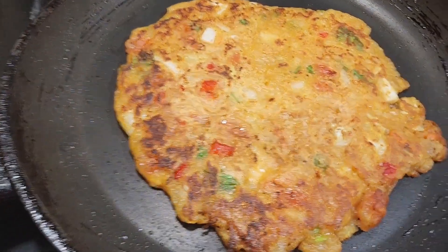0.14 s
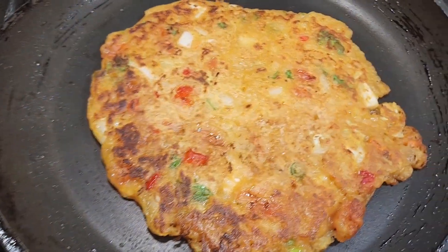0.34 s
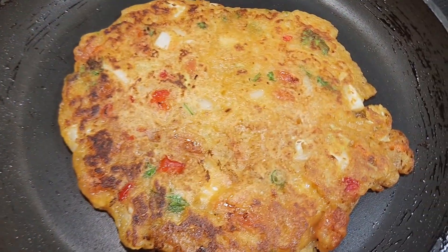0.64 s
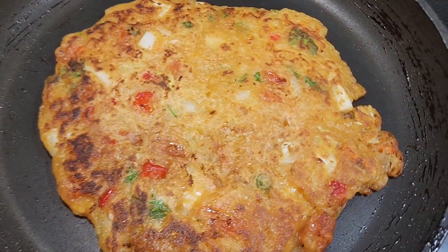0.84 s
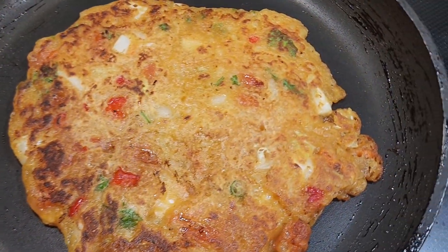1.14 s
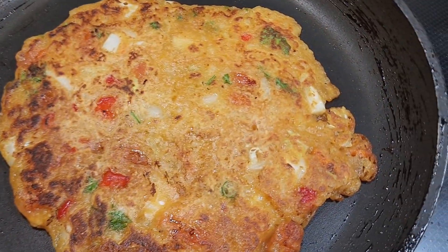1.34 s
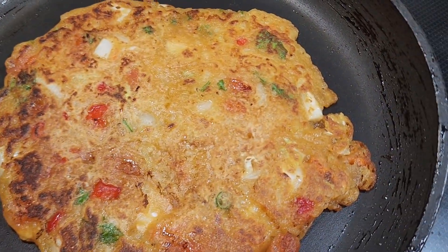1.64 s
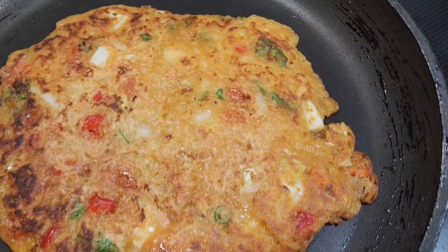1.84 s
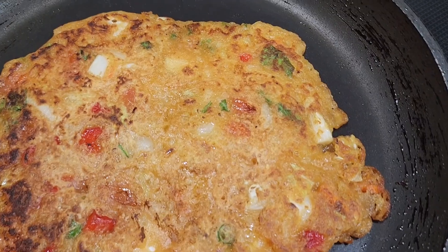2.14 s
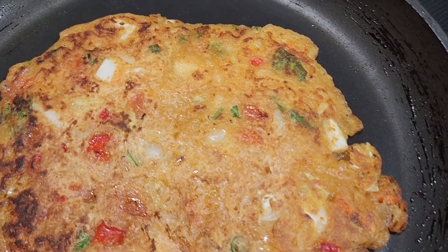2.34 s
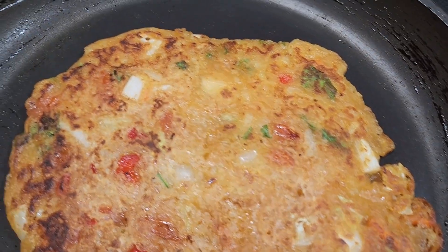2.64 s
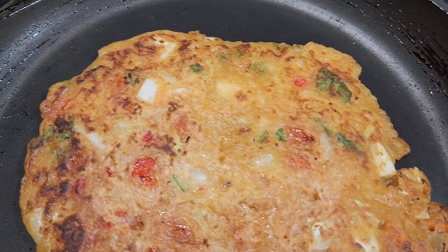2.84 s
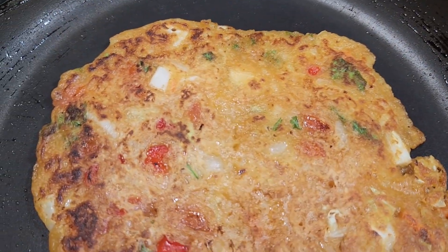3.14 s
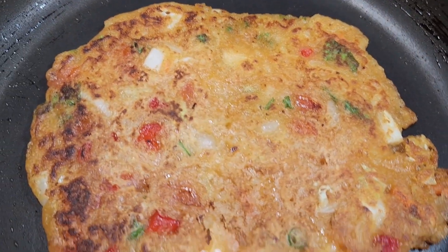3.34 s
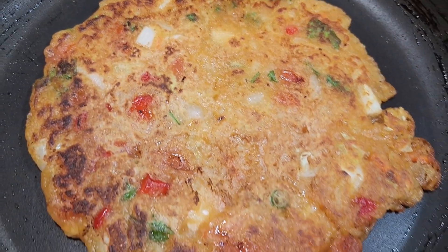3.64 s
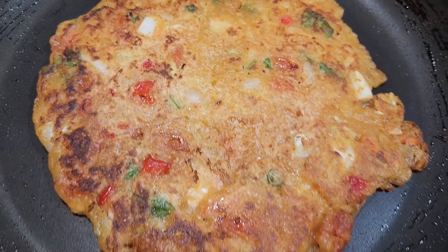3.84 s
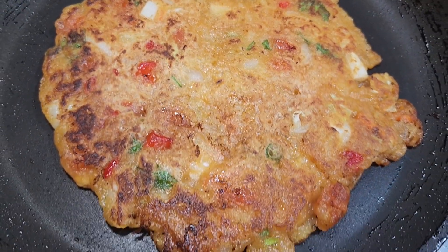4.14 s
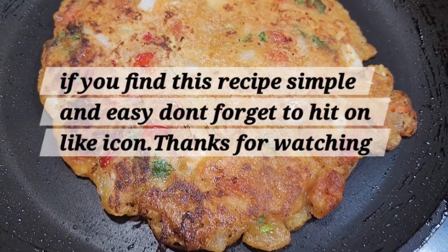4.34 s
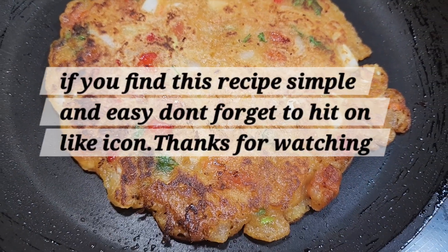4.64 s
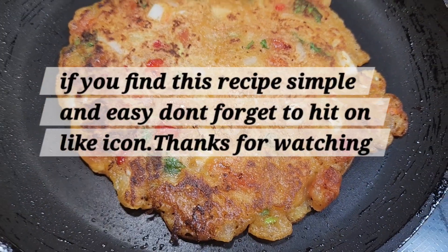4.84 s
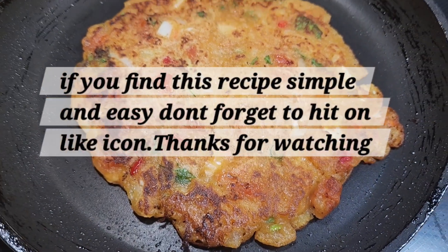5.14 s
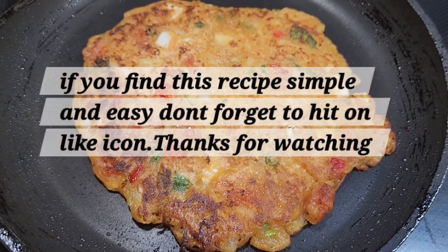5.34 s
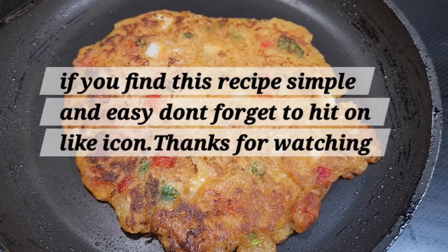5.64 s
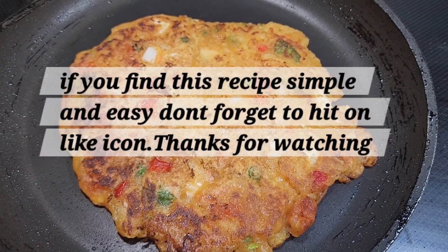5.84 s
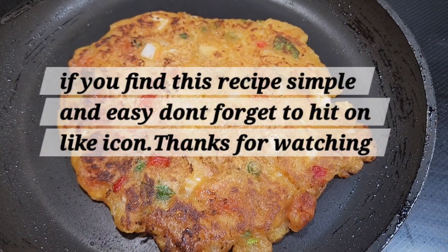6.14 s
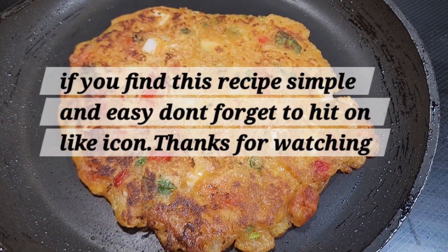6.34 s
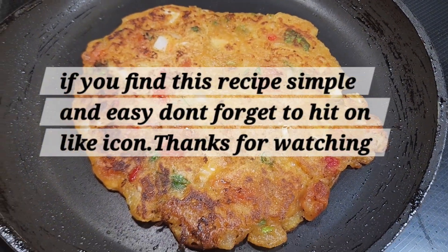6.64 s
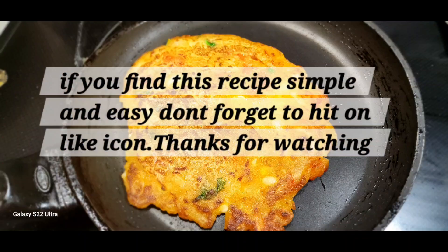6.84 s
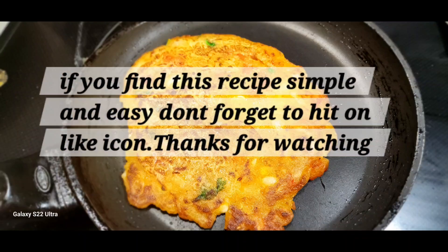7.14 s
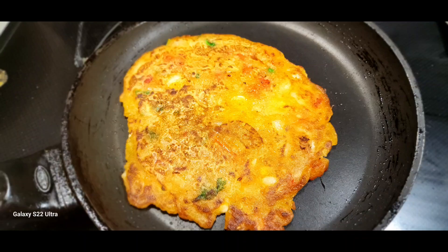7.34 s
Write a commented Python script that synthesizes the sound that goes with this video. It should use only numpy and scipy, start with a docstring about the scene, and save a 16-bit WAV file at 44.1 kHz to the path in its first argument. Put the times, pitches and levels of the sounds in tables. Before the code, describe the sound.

Close, fizzy frying with popping droplets and a few late spits of steam, above a low kitchen fan hum.

```python
"""A kitchen stove, two microphones close to a nonstick pan, the left one nearer, the right facing away.
A thick pancake fries gently: tiny steam bubbles fizz and crackle in the oil, surge early, then settle.
Single droplets pop as their films tear, and late on the batter spits short jets of steam.
A kitchen fan and a mains hum drone in the background; the sound stops abruptly."""
import sys
import numpy as np
from scipy import signal
from scipy.fft import rfft, irfft, next_fast_len
from scipy.io import wavfile
from scipy.ndimage import map_coordinates

SR = 44100
rng = np.random.default_rng(int(sys.argv[2]) if len(sys.argv) > 2 else 0)


def materialize(psi):
    """Save the field psi as 16-bit PCM at rate SR to the path in sys.argv[1].

    A 1-D psi becomes a single channel; in a 2-D psi each row is a channel.
    """
    bounded = np.clip(np.atleast_2d(psi).T, -1, 1)
    quanta = np.round(bounded * 32767).astype(np.int16)
    wavfile.write(sys.argv[1], SR, quanta)


N = 330740
SPIT_S, END_S = 5.5, 6.786  # the late spitting lasts from one to the other
TOP_HZ = 15620  # upper edge of the sound

# colour of the fan's rushing air: frequency_hz, relative_db
FAN_COLOUR = [(25, -17.5), (40, -11.5), (60, -6), (80, -1.5), (110, 4), (140, 0), (165, 1.5), (215, -2),
              (290, -1.5), (450, -12), (600, -14.5), (820, -20.5), (1300, -19.5), (1750, -21),
              (2400, -25.5), (6000, -31)]
# resonances of the fan's housing and the stove corner: centre_hz, width_hz, left_lift_db, right_lift_db
FAN_RESONANCES = [(251, 27, 4.5, 3), (394.6, 39, 9.5, 5), (512, 55, 11, 2), (692, 50, 0.5, 10.5),
                  (746, 57, 7, -19), (951, 79, 4, 6.5), (1260, 42, 0, 9), (1560, 280, 6.5, 0)]
# likeness of the air noise at the two microphones: frequency_hz, likeness (0-1)
FAN_LIKENESS = [(60, 0.98), (130, 0.99), (290, 0.95), (640, 0.89), (1400, 0.34), (3000, 0.08)]
# steady tones of the fan and the mains: pitch_hz, level_db, waver_db
HUM_TONES = [(92.53, -37, 1), (119.1, -40, 1.5), (186.5, -51, 1), (250, -52, 3), (399, -58, 3)]
# decay of the small kitchen: frequency_hz, t60_s
ROOM_DECAY = [(300, 0.33), (3000, 0.2), (14000, 0.11)]
# surges of the frying as moisture reaches the oil: peak_s, rise_s, fall_s, lift_db
FRYING_SURGES = [(.46, 0.18, 0.22, 4), (.95, 0.16, 0.24, 1.1), (1.3, 0.19, 0.092, 0.75),
                 (2.301, 0.39, 0.25, 1), (5.9, 0.41, 0.91, 2)]
# colour of the fizz at each microphone, and of the crackle: frequency_hz, relative_db
FIZZ_LEFT = [(300, -34), (900, -11.5), (1650, -1), (2300, 1.5), (3300, -0.5), (5200, -10), (8000, -2),
             (10000, -10), (11500, 0.5), (12800, 2), (14000, 0.5), (15300, 4)]
FIZZ_RIGHT = [(300, -35.5), (900, -2.5), (1500, -15.5), (2200, -15), (3300, -30), (6000, -5), (7500, -6.5),
              (8800, -19.5), (11000, -22), (15300, -7.5)]
CRACKLE_COLOUR = [(500, -36.5), (1500, -12), (2600, 2), (4200, 5), (6000, -4.5), (8000, -4.5),
                  (10300, -0.5), (11500, 6.5), (12700, 4.5), (15300, 1)]
# steam jets from under the batter: start_s, level_db, t60_s, vent_hz, whistle (0-1), rim_jolt (0-1)
STEAM_JETS = [(5.5828, -24.5, 0.05, 1520, 0, 1), (5.592, -32.5, 0.3, 1520, 0, 0),
              (5.7015, -27.3, 0.135, 1860, 0.45, 0.4), (5.992, -39, 0.23, 1710, 0, 0)]
# colour of escaping steam: frequency_hz, relative_db
STEAM_COLOUR = [(500, -24.5), (1500, -5), (3600, 1), (5500, -4.5), (9000, -1.5), (12000, -1), (15500, -2.5)]
# partials of the pan's bare rim: pitch_hz, level_db
RIM_PARTIALS = [(3050, -44), (4570, -45), (5650, -41), (6840, -38), (9030, -40), (10520, -36), (12900, -40)]
# partials of the pan, damped by the batter: pitch_hz, relative_db, t60_s
PAN_PARTIALS = [(1464, -3, 0.015), (1900, -4.5, 0.01), (2540, 2.5, 0.0094)]
# the loudest bursting droplets: start_s, relative_db, left_over_right_db, body_over_snap_db
LOUD_DROPLETS = [(0.1947, -34, 15, -8), (0.2535, -33, 13, -8), (0.2606, -26.5, 17, -10),
                 (0.269, -34, 13, -8), (0.312, -34, 16, -5), (0.3203, -33, 16, -6), (0.3478, -33, 16, -6),
                 (0.386, -32, 16, -10), (0.3954, -28, 16, -10), (0.4102, -30, 15, -7),
                 (0.4237, -31, 16, -5), (0.4366, -28.5, 15, -8), (0.451, -28.5, 18, -10),
                 (0.4602, -31, 16, -8), (0.4785, -30.5, 16, -10), (0.4845, -28.5, 17, -10),
                 (0.4987, -27, 17, -10), (0.5232, -28, 14, -9), (0.5362, -31.5, 16, -10),
                 (0.5405, -32, 16, -10), (0.5678, -31, 16, -6), (0.5979, -26.5, 17, -10),
                 (0.6184, -28, 18, -10), (0.6436, -33, 17, -7), (0.6591, -34, 16, -8),
                 (0.6811, -34.5, 14, -6), (0.8181, -30.5, 17, -6), (0.8502, -32.5, 19, -8),
                 (0.9071, -22.3, 15, -10), (0.9229, -26.5, 18, -8), (0.9704, -33.5, 16, -8),
                 (1.0268, -33.5, 16, -8), (1.0527, -33.5, 15, -8), (1.0662, -33, 16, -8),
                 (1.179, -28, 17, -6), (1.2253, -34.5, 14, -8), (1.2605, -23.2, 16, -7),
                 (1.2822, -31, 17, -8), (1.3391, -34.5, 17, -6), (1.3565, -28, 17, -10),
                 (1.377, -33, 16, -6), (1.6173, -29.5, 12, -8), (1.7825, -35, 14, -8),
                 (2.1108, -36, 14, -1), (2.1273, -36.5, 16, -1), (2.1705, -33.5, 4, -4),
                 (2.2635, -36.5, 16, -8), (2.2749, -34, 16, -3), (2.3356, -28, 4, -11),
                 (2.4565, -34, 17, -6), (2.6005, -31.5, 2, -4), (2.821, -30, 17, -4),
                 (2.8726, -34.5, 14, -3), (2.9492, -29.5, 16, -6), (3.1085, -28, 10, -8),
                 (3.717, -30, 13, -6), (4.6899, -38.5, -1, -1), (4.8424, -34.5, -3, 0),
                 (4.9474, -36, -2, -3), (5.1655, -36, 14, -11), (5.3103, -33, 12, -16),
                 (5.3784, -35.5, -1, -8), (5.5533, -27.3, 1, 2), (5.5826, -26, -4, -5),
                 (5.6371, -21.5, 3, 1), (5.6484, -24.3, 0, -2), (5.7139, -32, 0, -5), (5.8413, -34, 4, -4),
                 (5.8518, -36, 1, -3), (5.8955, -31, 3, -2), (6.0168, -35, 2, 0), (6.0447, -28, 0, -2),
                 (6.3216, -33, 3, -2), (6.4448, -32, 3, -3), (6.57, -36, 2, -1), (6.6789, -36.5, 2, -3),
                 (6.7642, -28, 2, -1)]
# colour of a pop's dark body and of its film's bright snap: frequency_hz, relative_db
BODY_COLOUR = [(400, -30), (900, -15), (1400, -1), (2400, -0.5), (4000, -0.5), (6500, -6), (15000, -33)]
SNAP_COLOUR = [(1600, -28), (3000, -6.5), (4500, -1.5), (7000, -1), (9800, -1.5), (12500, 5), (15500, 1.5)]
# further colouring of the pops at the right microphone, off axis: frequency_hz, relative_db
OFF_AXIS_COLOUR = [(1800, -5), (4000, -1), (6800, 6.5), (10000, 7.5), (13000, 3)]


def amp(db):
    """Decibels to gain."""
    return 10 ** (np.asarray(db) / 20)


def unit(x):
    """x at rms 1."""
    return x / np.sqrt(np.mean(x ** 2) + 1e-20)


def along(points, hz):
    """(Hz, value) points read on a log axis."""
    f, v = np.transpose(points)
    return np.interp(np.log(hz + 1), np.log(f + 1), v)


def wobble(rate):
    """A smooth random curve with rate knots a second."""
    knots = rng.standard_normal(int(N * rate / SR) + 4)
    return map_coordinates(knots, [np.arange(N) * rate / SR])


def filtered(x, response):
    """x times a response of frequency."""
    size = next_fast_len(N + SR // 2)
    return irfft(rfft(x, size) * response(np.fft.rfftfreq(size, 1 / SR)), size)[..., :N]


def coloured(x, spectrum, size=1024):
    """x through a causal filter that keeps attacks sharp and the power of white noise unchanged."""
    gain = unit(amp(along(spectrum, np.fft.rfftfreq(size, 1 / SR))))
    cepstrum = irfft(np.log(gain))
    cepstrum[1:size // 2] *= 2  # fold to minimum phase
    cepstrum[size // 2 + 1:] = 0
    impulse = irfft(np.exp(rfft(cepstrum)))
    return signal.fftconvolve(x, impulse[None], axes=1)[:, :N]


def panned(pan_db):
    """Left and right gains of unit mean power; positive is left."""
    return unit(amp([[pan_db / 2], [-pan_db / 2]]))


def add(track, start_s, sound):
    """Mix a sound into the track at start_s."""
    part = track[:, round(start_s * SR):][:, :sound.shape[1]]
    part += sound[:, :part.shape[1]]


def hum(drift_rad=0.12):
    """In the background the fan's blade tone and the mains hum beat under fainter tones, all wavering."""
    t = np.arange(N) / SR
    return sum(np.sqrt(2) * amp(db + waver_db * wobble(5))
               * np.sin(2 * np.pi * hz * t + drift_rad * wobble(3)) for hz, db, waver_db in HUM_TONES)


def fan(low_db=-36, upper_db=-46, split_hz=800, waver_db=0.3):
    """Air rushes through the fan's resonant housing; the bass is alike at both microphones."""
    def mid_and_side(hz):
        angle = np.arccos(np.clip(along(FAN_LIKENESS, hz), -1, 1)) / 2
        return np.array([np.cos(angle), np.sin(angle)])

    def housing(hz):
        lift_db = sum(np.outer([left, right], np.exp(-2 * ((hz - centre) / width) ** 2))
                      for centre, width, left, right in FAN_RESONANCES)
        return amp(along(FAN_COLOUR, hz) + lift_db)

    mid, side = filtered(rng.standard_normal((2, N)), mid_and_side)
    air = filtered(np.array([mid + side, mid - side]), housing)
    low = filtered(air, lambda hz: 1 / (1 + (hz / split_hz) ** 8))
    return (amp(low_db) * unit(low) + amp(upper_db) * unit(air - low)) * amp(waver_db * wobble(1.6))


def fan_note(centre_hz=1278, q=16, faint_db=-64, full_db=-53.5, draw_back_s=4.8, rise_s=0.8):
    """A narrow band of the fan's air makes a fuzzy note, growing as the microphones draw back."""
    common, left, right = signal.lfilter(*signal.iirpeak(centre_hz, q, SR), rng.standard_normal((3, N)))
    growth = np.clip((np.arange(N) / SR - draw_back_s) / rise_s, 0, 1)
    return unit(common + np.array([left, right])) * amp(faint_db + (full_db - faint_db) * growth)


def kitchen_echo(x, wall_s, wall_db, tail_db):
    """The pan wall and stove scatter a quick, close echo; the small room adds a short tail."""
    hz, frame_s, noise = signal.stft(rng.standard_normal((2, SR // 4)), SR, nperseg=256)
    decay = amp(-60 * frame_s / along(ROOM_DECAY, hz)[:, None])
    tail = signal.istft(noise * decay, SR, nperseg=256)[1]
    t = np.arange(tail.shape[1]) / SR
    tail *= t > wall_s
    near = rng.standard_normal(tail.shape) * (t / wall_s) ** 2 * np.exp(-2 * t / wall_s)
    echo = amp(wall_db) * near / np.linalg.norm(near[0]) + amp(tail_db) * tail / np.linalg.norm(tail[0])
    return signal.fftconvolve(x.mean(0)[None], echo, axes=1)[:, :N]


def bubbles(per_s, spread_db, life_s, size=64):
    """Bubbles bursting at random, each a brief damped ring; most are tiny, a few large."""
    start, pitch, strength, life = rng.random((int(per_s * N / SR), 4)).T[:, :, None]
    t = np.arange(size) / SR
    level_db = -spread_db * np.log(.01 + strength)
    decay = np.exp(-t / (life_s * (.5 + life)))
    rings = amp(level_db) * np.sin(2 * np.pi * pitch * TOP_HZ * t) * decay
    where = (start * N).astype(int) + np.arange(size)
    return unit(np.bincount(where.ravel(), rings.ravel(), N + size)[:N])


def spatter(level_db=-55, pan_db=5):
    """Coarse single bubbles tick faintly in the middle of the pan and reach both microphones."""
    ticks = amp(level_db) * bubbles(per_s=240, spread_db=2.5, life_s=.00008)
    return coloured(panned(pan_db) * np.array([ticks, np.roll(ticks, 4)]), STEAM_COLOUR)


def rim(t, t60_s=.15):
    """The bare rim rings briefly, each partial a little out of step at the two microphones."""
    partials = sum(amp(db) * np.sin(2 * np.pi * hz * t + rng.standard_normal((2, 1)))
                   for hz, db in RIM_PARTIALS)
    return partials * amp(-60 * t / t60_s)


def steam_jets(rise_s=0.00014, pan_db=-2.5, vent_q=7, vent_echo=.45, sputter_db=.9):
    """Trapped steam breaks out and hisses away; its vent resonates like a pipe, its jolt rings the rim."""
    hiss, tones = np.zeros((2, 2, N))
    t = np.arange(SR // 4) / SR
    hz = np.fft.rfftfreq(len(t), 1 / SR)
    for start_s, db, t60_s, vent_hz, strength, jolt in STEAM_JETS:
        envelope = amp(db - 60 * t / t60_s) * (1 - np.exp(-t / rise_s))
        steam, flow = rng.standard_normal((2, 2, len(t)))
        pipe = 1 / (1 - vent_echo * np.exp(-2j * np.pi * hz / vent_hz))
        whistle = unit(signal.lfilter(*signal.iirpeak(2 * vent_hz, vent_q, SR), flow))
        add(hiss, start_s, envelope * unit(irfft(rfft(steam) * pipe, len(t))))
        add(tones, start_s, envelope * strength * whistle + jolt * rim(t))
    return (coloured(hiss, STEAM_COLOUR) + tones) * amp(sputter_db * wobble(560)) * panned(pan_db)


def sizzle_lift_db(quiet_start_db=8.5, onset_s=0.091, ebb_db_per_s=0.66):
    """How loud the sizzle is: it swells in, surges a few times and slowly ebbs."""
    t = np.arange(N) / SR
    surges_db = sum(db * np.exp(-((t - peak_s) / np.where(t < peak_s, rise_s, fall_s)) ** 2)
                    for peak_s, rise_s, fall_s, db in FRYING_SURGES)
    return surges_db - quiet_start_db * np.exp(-t / onset_s) - ebb_db_per_s * t


def late_droplets(count=14, least_db=-43, most_db=-38, scatter_db=4, thinnest_db=-8):
    """Rows of lesser droplets that burst around the middle of the pan once the batter spits."""
    lowest = [SPIT_S, least_db, -scatter_db, thinnest_db]
    highest = [END_S, most_db, scatter_db, 0]
    return rng.uniform(lowest, highest, (count, 4))


def near_droplets(count=360, base_db=-41.5, spread_db=0.7, liveliness=0.85, crowding=1.7):
    """Rows of lesser droplets at the pancake's near edge, thicker and harder when the sizzle is loud."""
    pan_db, body_db = 16, -14
    turn, strength = rng.random((count, 2)).T
    lift_db = sizzle_lift_db()
    bursts_so_far = np.cumsum(amp(crowding * lift_db))
    where = np.searchsorted(bursts_so_far, turn * bursts_so_far[-1])
    size_db = -spread_db * np.log(.12 + strength)
    level_db = base_db + size_db + liveliness * lift_db[where]
    return [(start_s, db, pan_db, body_db) for start_s, db in zip(where / SR, level_db)]


def film_snap(body_db, decay_s=.0007, alike=.7, size=256):
    """A droplet's film tears: a bright snap over a darker body, of unit energy at each microphone."""
    hz = np.fft.rfftfreq(128, 1 / SR)
    bright = unit(amp(along(SNAP_COLOUR, hz)))
    body = amp(body_db) * unit(amp(along(BODY_COLOUR, hz)))
    colour = np.column_stack([hz, 20 * np.log10(np.hypot(bright, body))])
    envelope = np.exp(-np.arange(size) / SR / decay_s)
    common, left, right = rng.standard_normal((3, size))
    splash = (common + np.array([left, right]) * (1 - alike) / alike) * envelope
    even_splash = irfft(np.exp(1j * np.angle(rfft(splash))))  # equally strong at every frequency
    burst = coloured(even_splash * envelope ** .25, colour)
    return burst / np.linalg.norm(burst, axis=1, keepdims=True)


def pops(droplets, gain_db=20, ring_db=-10, lag_s_per_db=.000018, midway_db=3):
    """Each bursting droplet snaps and knocks the pan; the nearer microphone hears it first."""
    left, right = np.zeros((2, 1, N))
    t = np.arange(SR // 20) / SR
    ring = sum(amp(db - 60 * t / t60_s) * np.sin(2 * np.pi * hz * t) for hz, db, t60_s in PAN_PARTIALS)
    ring = amp(ring_db) * ring / np.linalg.norm(ring)
    for start_s, db, pan_db, body_db in droplets:
        gain = panned(pan_db) * amp(db + gain_db)
        lag_s = lag_s_per_db * (pan_db - midway_db)
        for sound in (gain * film_snap(body_db), gain * amp(body_db) * ring):
            add(left, start_s, sound[:1])
            add(right, start_s + lag_s, sound[1:])
    return np.vstack([left, coloured(right, OFF_AXIS_COLOUR)])


def sizzle(base_db=-42.5, fizz_db=2, crackle_db=-0.55, liveliness=0.96, far_side_db=-13):
    """Close to the left microphone tiny bubbles merge into a fizz; the louder, the more it crackles."""
    lift_db = sizzle_lift_db() + 0.53 * wobble(14)
    fizz = np.array([bubbles(per_s=14000, spread_db=3, life_s=.00016) for _ in range(2)])
    fizz = filtered(fizz, lambda hz: unit(amp([along(FIZZ_LEFT, hz), along(FIZZ_RIGHT, hz)])))
    crackle = bubbles(per_s=3300, spread_db=6, life_s=.00006)
    # the right microphone faces away and catches the crackle weakly and late
    far_crackle = amp(far_side_db) * np.roll(crackle, 9)
    crackle = coloured(np.array([crackle, far_crackle]), CRACKLE_COLOUR)
    crackle *= amp(crackle_db + liveliness * lift_db)
    return amp(base_db + lift_db) * (amp(fizz_db) * fizz + crackle)


def scene():
    """The frying pan close up, the drone of the fan behind it."""
    spits = pops([*LOUD_DROPLETS, *near_droplets(), *late_droplets()]) + steam_jets() + spatter()
    frying = sizzle() + spits
    echo = kitchen_echo(spits, wall_s=0.0028, wall_db=-4.5, tail_db=-9.5)
    return frying + echo + fan() + fan_note() + hum()


def record(dry):
    """The sound ends in a 6 ms fade, and the treble falls away steeply above TOP_HZ."""
    fade = np.clip((END_S - np.arange(N) / SR) / .006, 0, 1)
    return filtered(dry * fade, lambda hz: 1 / np.hypot(1, (hz / TOP_HZ) ** 130))


dry = scene()
out = record(dry)
materialize(out)
```